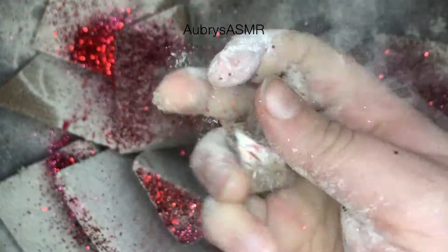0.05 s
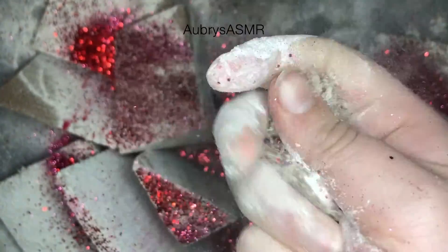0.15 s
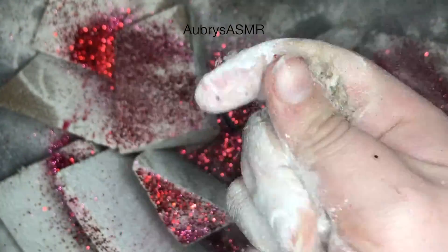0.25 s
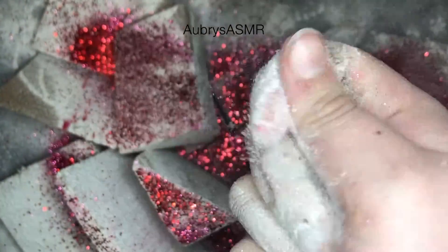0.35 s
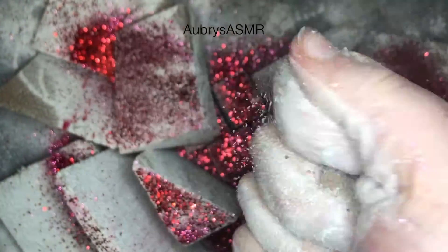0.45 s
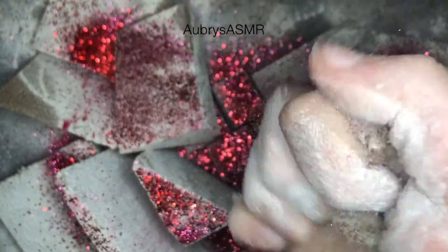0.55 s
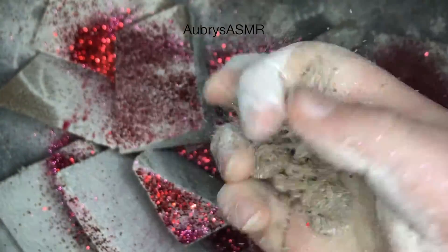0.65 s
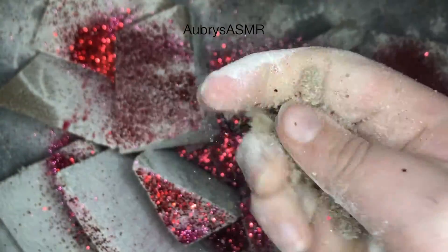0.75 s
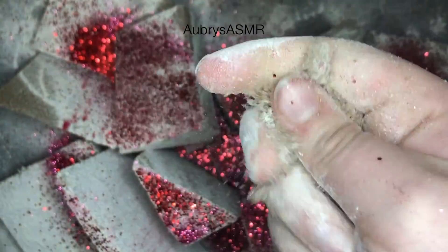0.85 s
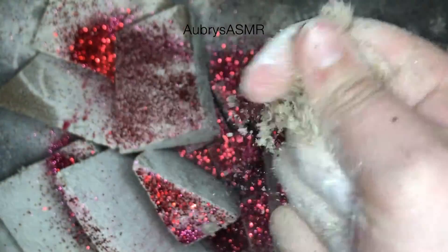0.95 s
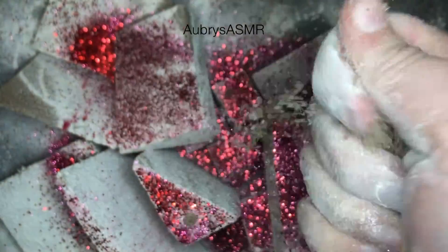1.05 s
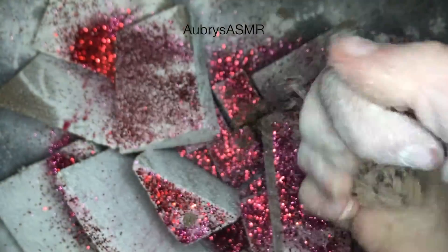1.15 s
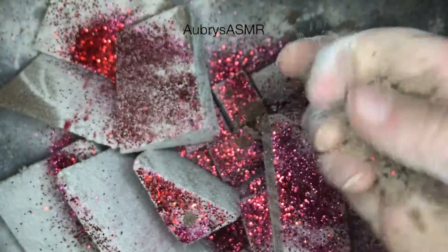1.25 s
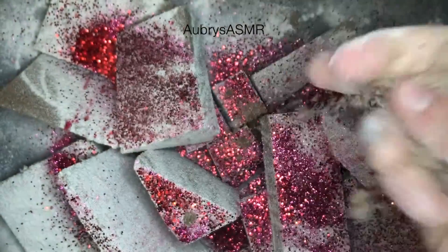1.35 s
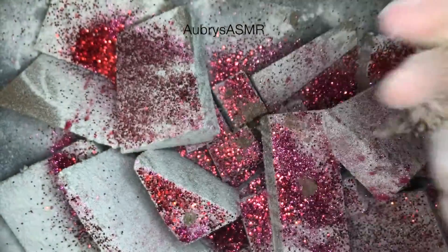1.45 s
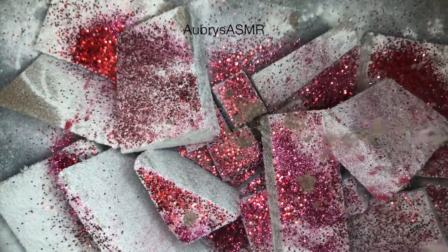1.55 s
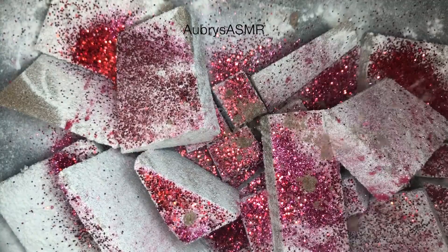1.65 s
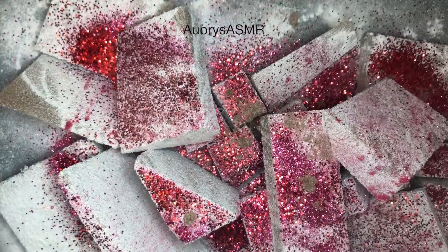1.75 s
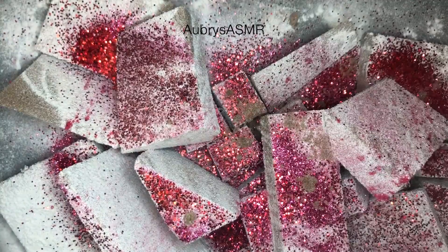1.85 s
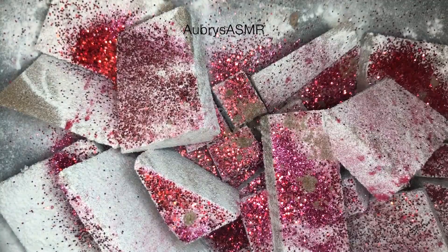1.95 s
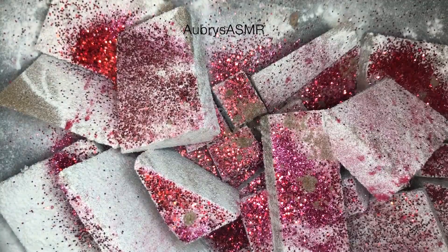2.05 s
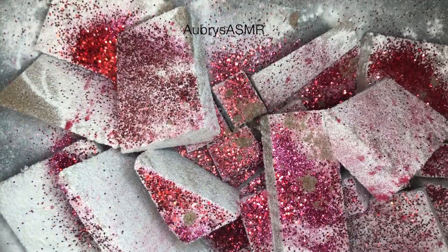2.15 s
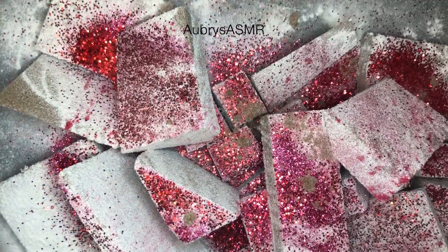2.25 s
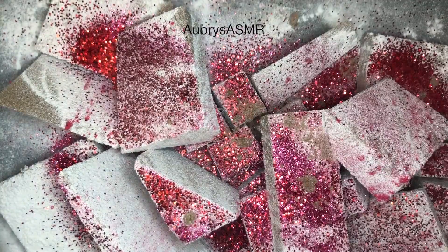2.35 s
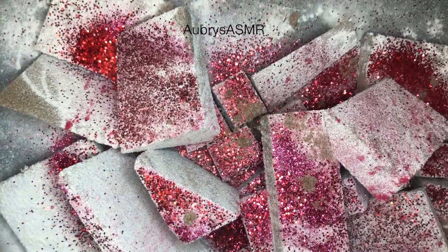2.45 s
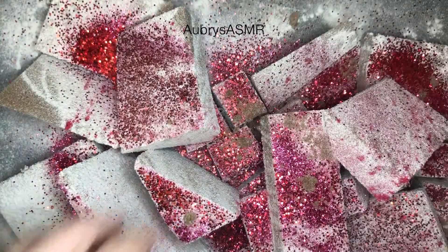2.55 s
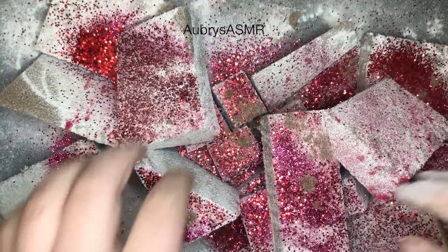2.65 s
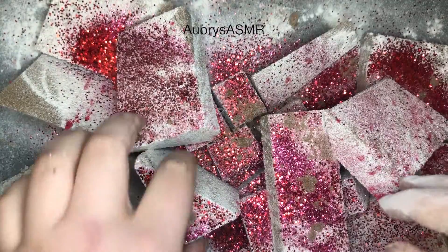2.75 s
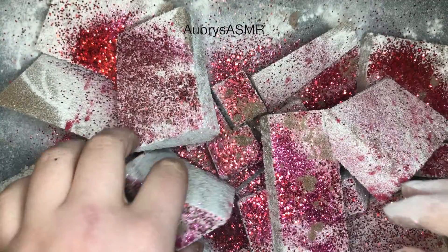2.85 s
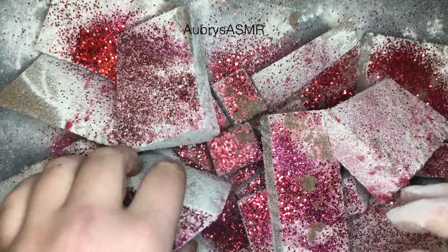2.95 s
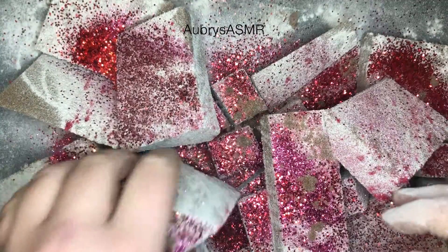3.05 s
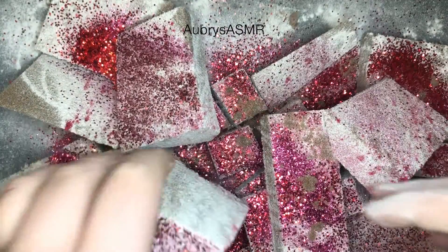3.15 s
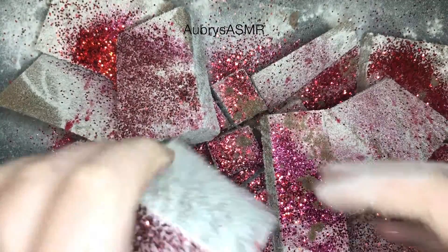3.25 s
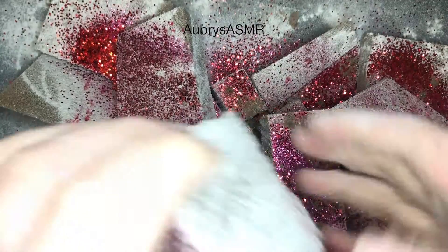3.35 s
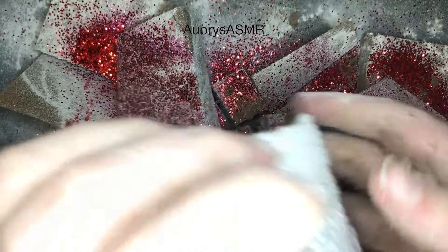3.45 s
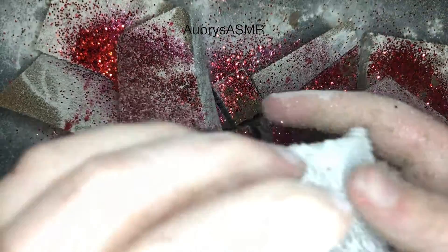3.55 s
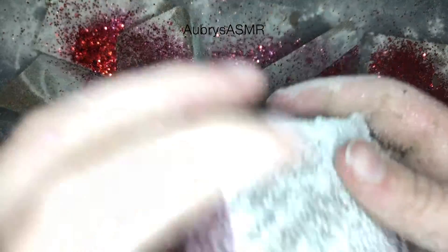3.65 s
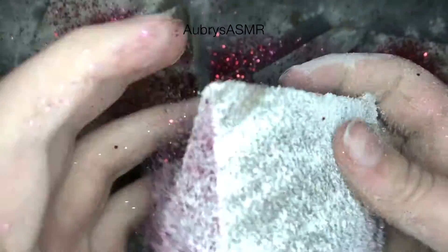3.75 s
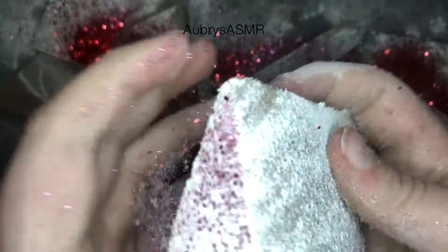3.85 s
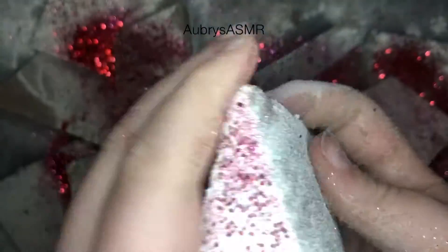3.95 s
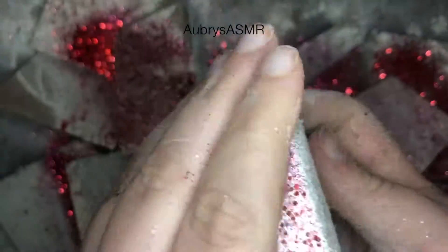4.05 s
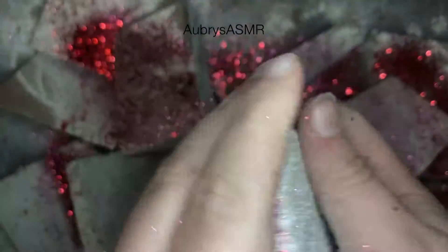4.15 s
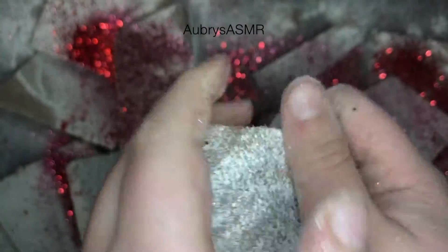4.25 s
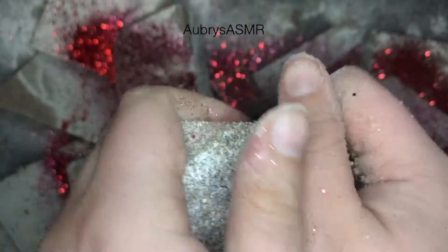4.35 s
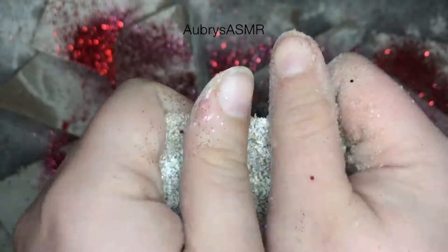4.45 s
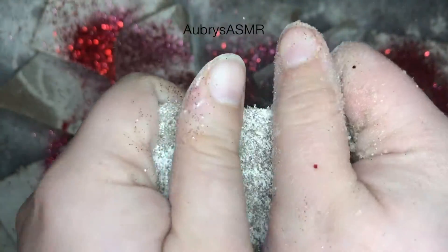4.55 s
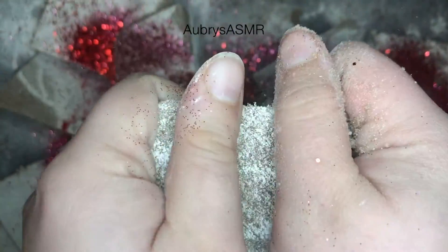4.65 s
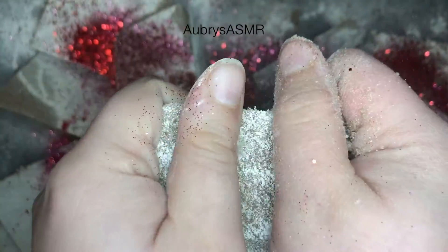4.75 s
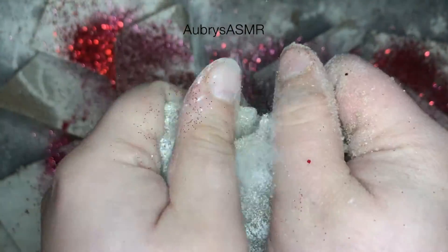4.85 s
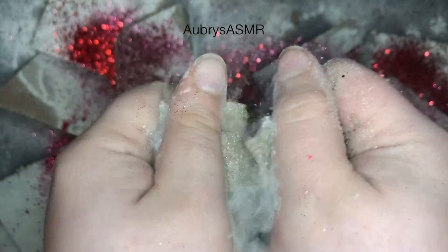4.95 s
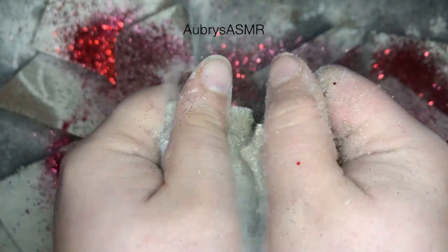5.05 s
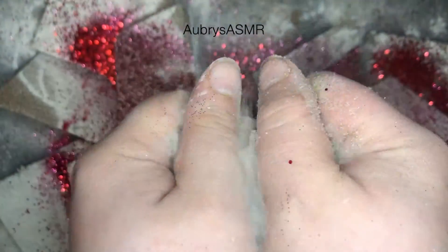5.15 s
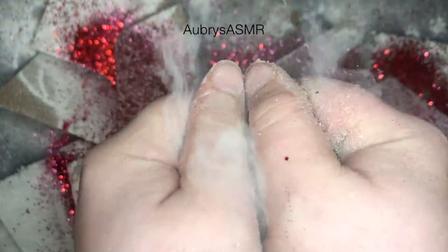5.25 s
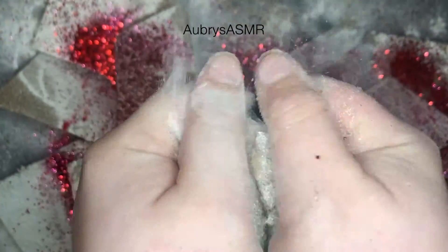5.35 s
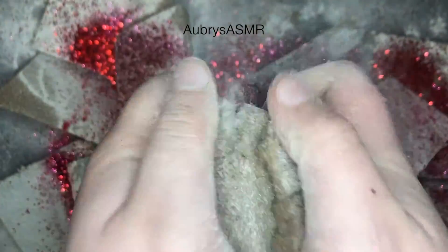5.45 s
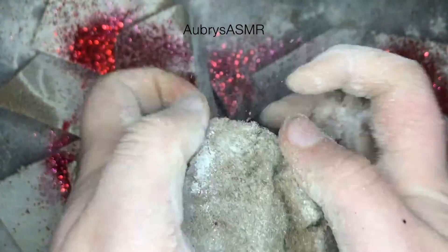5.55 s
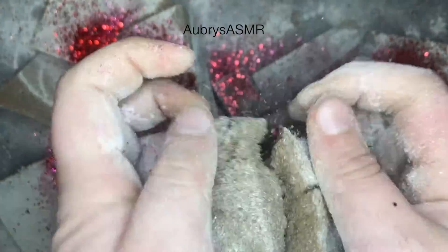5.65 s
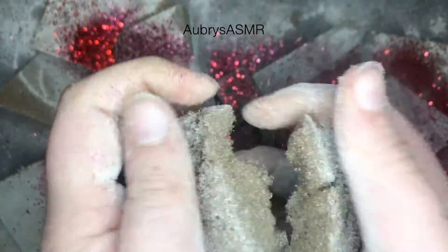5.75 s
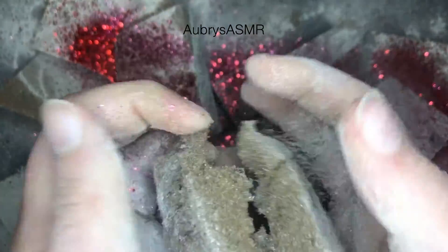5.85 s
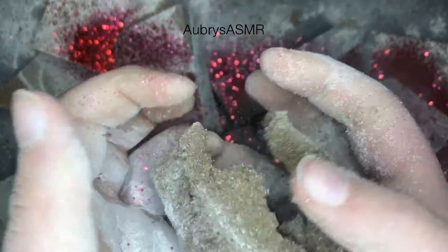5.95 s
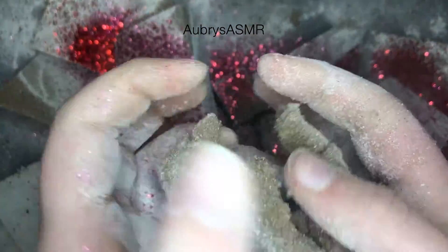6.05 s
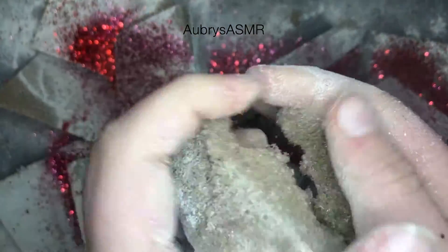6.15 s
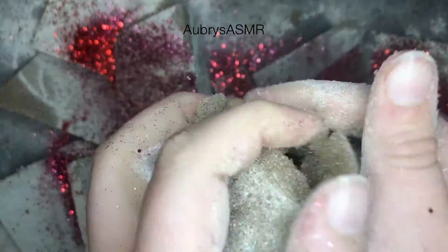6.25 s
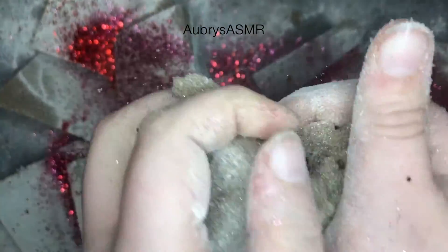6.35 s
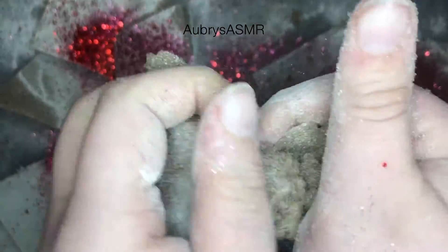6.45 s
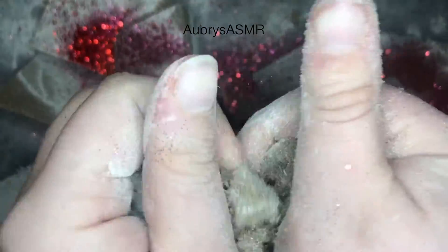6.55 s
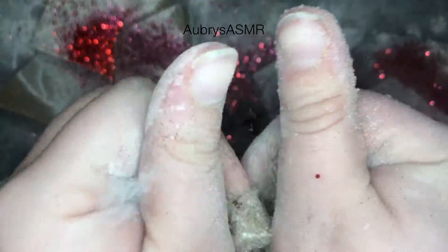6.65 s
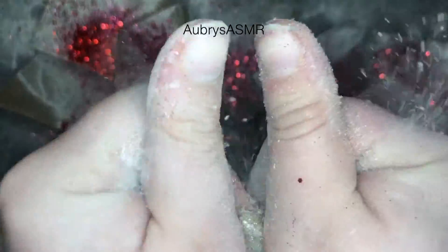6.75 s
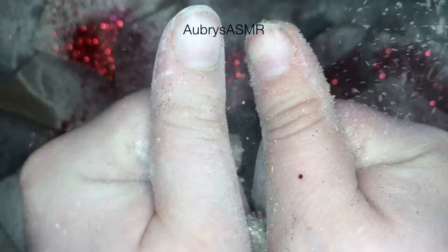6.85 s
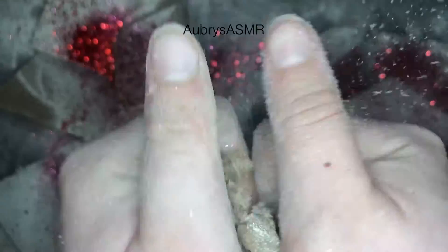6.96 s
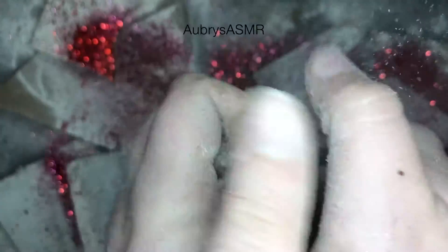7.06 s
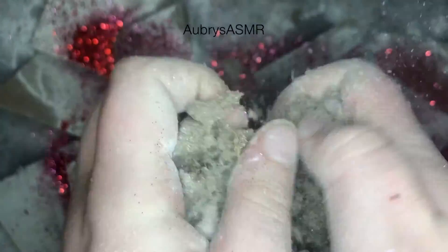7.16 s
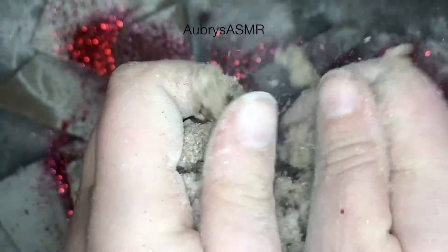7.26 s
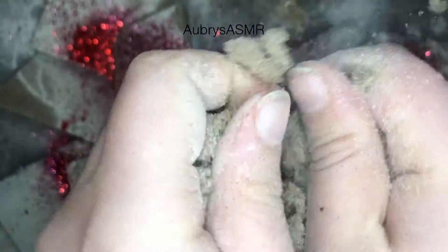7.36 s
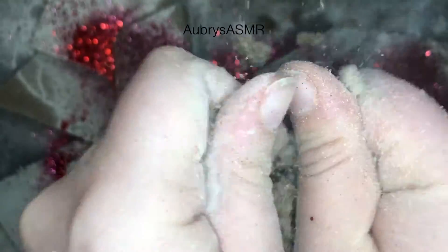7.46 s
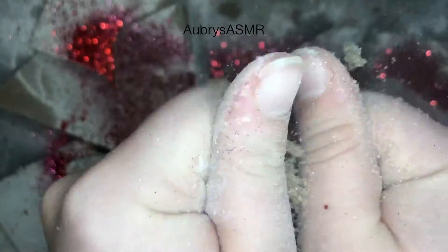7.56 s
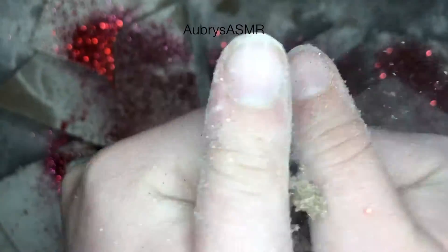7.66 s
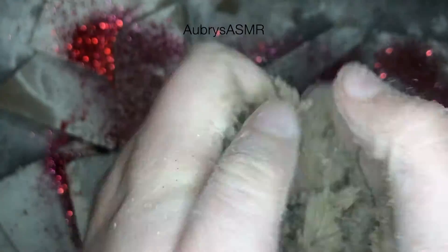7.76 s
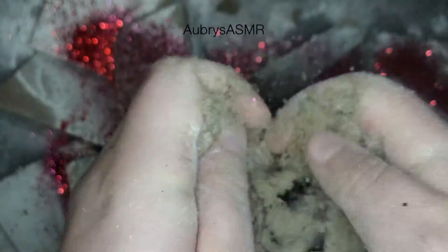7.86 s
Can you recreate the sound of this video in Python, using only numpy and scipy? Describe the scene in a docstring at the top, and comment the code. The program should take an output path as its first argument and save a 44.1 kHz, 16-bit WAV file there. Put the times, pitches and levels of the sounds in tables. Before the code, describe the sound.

Dry brittle foam blocks are crushed in the hands very close up, crackling crisply in two crunchy bouts with a quiet, dusty pause between.

```python
"""Dry foam crumbled by hand

Foam blocks are squeezed and crumbled close to a microphone in a quiet room. Brittle cells snap in clumps:
random clicks and powder noise strike resonances of the cell walls, the block (with a narrow fixed peak,
probably the microphone's) and the cupped hands. Larger cracks are short bursts through walls and block;
dull knocks are puffs through one low resonance.
Short echoes follow, over shaped noise (rumble, hiss) and a faint wavering hum."""
import sys
import numpy as np
from scipy import signal
from scipy.fft import rfft, irfft
from scipy.io import wavfile

SR = 44100
rng = np.random.default_rng(int(sys.argv[2]) if len(sys.argv) > 2 else 0)


def convert_level_to_amplitude(level_db):
    """Map a level in decibels to its linear amplitude factor."""
    exponent = np.asarray(level_db, float) / 20
    return 10 ** exponent


def materialize(psi):
    """Save the field psi as 16-bit PCM at rate SR to the path in sys.argv[1].

    A 1-D psi becomes a single channel; in a 2-D psi each row is a channel.
    """
    bounded = np.clip(np.atleast_2d(psi).T, -1, 1)
    quanta = np.round(bounded * 32767).astype(np.int16)
    wavfile.write(sys.argv[1], SR, quanta)


N = 347949

# cell-wall resonances: f/Hz, width/Hz, relative level/dB
WALL_MODES = [(6740, 1760, -3.5), (8520, 2130, 1.5), (10720, 2000, -0.5), (12840, 5500, -1.5),
              (14840, 1660, 3.5)]
# block resonances, with a narrow fixed peak near 3.2 kHz, probably the microphone's:
# f/Hz, width/Hz, relative level/dB
BLOCK_MODES = [(1673, 430, -12), (2400, 820, -4.5), (3255, 410, 0), (3215, 1200, 1), (3910, 780, -4),
               (4900, 1800, -10)]


def crunch():
    """One train of snaps rings walls and block; coarser crumbs ring the hollow of the hands."""
    # finger presses and touches: full force at t/s, held/s, fizz level/dB, build-up/s, let-go/s
    press_table = [(0.001, 0, -51.5, 1, 0.055), (0.136, 0.0015, -27, 0.044, 0.096),
                   (0.197, 0.14, -30.5, 0.12, 0.061), (0.413, 0.038, -38, 0.25, 0.25),
                   (0.601, 0.031, -48.5, 0.042, 0.014), (0.656, 0, -48, 0.017, 0.06),
                   (0.855, 0.0028, -35.5, 0.07, 0.34), (1.133, 0.071, -46, 0.039, 0.026),
                   (1.437, 0.069, -37.5, 0.12, 0.055), (1.596, 0.017, -46, 0.11, 0.22),
                   (1.845, 0.022, -57.5, 0.42, 0.039), (2.002, 0.085, -63, 0.0086, 0.05),
                   (2.04, 0.021, -47, 0.0095, 0.14), (2.195, 0.044, -58, 0.21, 0.11),
                   (2.378, 0.012, -64, 0.004, 0.059), (2.86, 0.055, -52.5, 0.021, 0.045),
                   (2.978, 0.001, -49, 0.006, 0.28), (3.071, 0.00041, -48, 0.0068, 0.02),
                   (3.178, 0.022, -49.5, 0.0081, 0.0065), (3.408, 0, -58.5, 0.0035, 0.017),
                   (3.442, 0.014, -61, 0.005, 0.032), (3.511, 0, -56.5, 0.033, 0.027),
                   (3.561, 0.011, -38.5, 0.0024, 0.029), (3.651, 0.06, -44.5, 0.088, 0.029),
                   (3.787, 0, -51, 0.0057, 0.086), (3.873, 0, -46.5, 0.01, 0.62),
                   (4.14, 0.28, -38, 0.34, 0.018), (4.333, 0.45, -38, 0.2, 0.085),
                   (4.476, 0.041, -32, 0.18, 0.049), (4.568, 0.054, -36, 0.027, 0.052),
                   (4.861, 0.012, -31.5, 0.71, 0.027), (4.882, 0, -26, 0.0075, 0.019),
                   (4.905, 0.0088, -29.5, 0.01, 0.019), (4.933, 0.0099, -30, 0.022, 0.0077),
                   (4.96, 0.0087, -40, 0.02, 0.05), (4.991, 0.014, -26.5, 0.013, 0.023),
                   (5.034, 0.03, -31.5, 0.012, 0.011), (5.111, 0.19, -29.5, 0.16, 0.11),
                   (5.46, 0.061, -44.5, 0.045, 0.11), (5.666, 0.012, -46.5, 0.19, 0.073),
                   (5.72, 0.029, -58.5, 0.11, 0.98), (6.125, 0.002, -50, 0.021, 0.23),
                   (6.258, 0.19, -38.5, 0.012, 0.169), (6.279, 0.484, -39, 0.17, 0.7),
                   (6.581, 0.005, -31, 0.19, 0.13), (6.701, 0.033, -31.5, 0.067, 0.41),
                   (6.949, 0, -47, 0.15, 0.19), (7.167, 0.0013, -42.5, 0.14, 0.091),
                   (7.296, 0, -39.5, 0.047, 0.11), (7.459, 0.068, -34, 0.17, 0.25),
                   (7.826, 0, -44, 0.08, 0.27)]
    # coarse crumbling in the hands: t/s, level/dB, build-up/s, let-go/s
    crumble_table = [(.376, -51, 0.26, 0.3), (.893, -55, 0.047, 0.041), (1.005, -58.5, 0.14, 0.17),
                     (1.47, -60, 0.13, 0.21), (1.66, -64.5, 0.16, 0.45), (2.91, -63, 0.34, 1),
                     (3.565, -52, 0.011, 0.038), (3.685, -57.5, 0.09, 0.054), (4.359, -45.5, 0.41, 0.28),
                     (4.9, -59, 0.28, 0.36), (5.24, -51, 0.2, 0.15), (5.53, -54, 0.11, 0.11),
                     (5.685, -60.5, 0.22, 0.26), (6.42, -49, 0.35, 0.42), (6.87, -53.5, 0.65, 0.16),
                     (7.19, -54.5, 0.22, 0.059), (7.655, -53, 0.62, 0.067), (7.85, -58.5, 0.24, 0.21)]
    # ring, high when freshly gripped, low once crushed flat: t/s, block against fizz at usual_db/dB
    grip_table = [(.1, -6), (.18, -4), (.24, -12), (.53, -10), (.66, -6.5), (.9, -6), (1.08, -17.5),
                  (1.18, -3), (1.5, -11.5), (1.69, -9), (1.86, -0.5), (2.05, -2.5), (2.33, -6), (2.38, 4),
                  (2.8, 3), (2.9, -5.5), (3.5, 1.5), (3.7, -7.5), (4.14, -2.5), (4.7, -7.5), (5.0, -5),
                  (5.4, -13), (5.47, -2.5), (6.13, -5.5), (6.5, -4), (6.722, -6), (6.82, -9.5), (6.88, -16),
                  (7.04, -5), (7.55, -8.5), (7.75, -2.5), (7.89, -8.5)]
    # cupped-hand resonances: f/Hz, width/Hz, relative level/dB
    hand_modes = [(250, 225, -3.5), (455, 465, -4.5), (723, 280, -5.5), (954, 680, -6), (1513, 335, -0.5)]
    usual_db, brighter_per_db, coarser_per_db = -41, 0.195, 0.07

    fizz_db = swells(*np.transpose(press_table), still_db=-82)  # still: constant faint hiss under the presses
    crumble_s, crumble_peak_db, rise_s, fall_s = np.transpose(crumble_table)
    crumble_db = swells(crumble_s, 0, crumble_peak_db, rise_s, fall_s, still_db=-81.5)

    # harder presses fizz more than they ring, and break larger cells; light touches stir powder
    harder_db = fizz_db - usual_db
    block_db = np.interp(np.arange(N) / SR, *np.transpose(grip_table)) - brighter_per_db * harder_db
    coarse_db = coarser_per_db * harder_db

    clicks = snaps(coarse_db, spread_db=3.5, clump_db=1.52)
    coarser = snaps(coarse_db, spread_db=2.0, clump_db=4.0)
    crumbs = rms_one(clicks) + 1.15 * rms_one(coarser)

    walls = rms_one(ring(clicks, WALL_MODES, scatter_db=1.5, wander_db=1.65))
    block = rms_one(ring(clicks, BLOCK_MODES, scatter_db=3.0, wander_db=3.0)) * convert_level_to_amplitude(block_db)
    hands = rms_one(ring(crumbs, hand_modes, scatter_db=4.5, wander_db=2.0))
    return convert_level_to_amplitude(fizz_db) * (walls + block) + convert_level_to_amplitude(crumble_db) * hands


def swells(s, held_s, level_db, rise_s, fall_s, still_db):
    """Level in dB: each effort builds up, holds, lets go; powers add over a still level."""
    ramp_db = 20  # a build-up or let-go spans this in its time
    now = np.arange(0, N + 32, 32)[:, None] / SR
    early = np.maximum(s - now, 0) / rise_s
    late = np.maximum(now - s - held_s, 0) / fall_s
    efforts = convert_level_to_amplitude(level_db - ramp_db * (early + late)) ** 2
    power = convert_level_to_amplitude(still_db) ** 2 + np.sum(efforts, axis=1)
    return np.interp(np.arange(N) / SR, now[:, 0], 10 * np.log10(power))


def snaps(coarse_db, spread_db, clump_db, dust_db=3.5):
    """Cells break at random, many small, few large, in clumps as a fracture runs; powder hisses between."""
    snaps_per_s = 900
    born = rng.random(N) < snaps_per_s / SR
    sizes_db = spread_db * np.minimum(rng.exponential(1, N), 4.0)
    breaks = rms_one(born * convert_level_to_amplitude(sizes_db))
    powder = rng.standard_normal(N)

    grain, dust = convert_level_to_amplitude(coarse_db), convert_level_to_amplitude(dust_db)
    mix = (grain * breaks + dust * powder) / np.hypot(grain, dust)
    clumps_db = clump_db * (0.38 * drift(30.0) + drift(129.0))
    return mix * convert_level_to_amplitude(clumps_db)


def ring(clicks, modes, scatter_db, wander_db):
    """Every click strikes each resonance at its own strength; colour wanders as the grip shifts."""
    out = 0
    for hz, width_hz, level_db in modes:
        chance_db = scatter_db * rng.standard_normal(N) + wander_db * drift(6.7)
        strength = convert_level_to_amplitude(level_db + chance_db) * rng.choice([-1, 1], N)
        struck = clicks * strength + 1e-18
        out = out + resonate(resonate(struck, hz, width_hz), hz, 3.4 * width_hz)
    return out


def resonate(x, hz, width_hz):
    """Two-pole resonance, gain about 1 on top."""
    r = np.exp(-np.pi * width_hz / SR)
    feedback = [1, -2 * r * np.cos(2 * np.pi * hz / SR), r * r]
    return signal.lfilter([(1 - r * r) / 2, 0, (r * r - 1) / 2], feedback, x)


def drift(rate_hz):
    """Slow chance: noise twice through a one-pole low-pass, rms about 1."""
    r = np.exp(-2 * np.pi * rate_hz / SR)
    slow = signal.lfilter([1], [1, -2 * r, r * r], rng.standard_normal(N + 4000))
    return rms_one(slow[4000:])  # filter start dropped


def rms_one(x):
    """Scale to rms 1."""
    return x / np.sqrt(np.mean(x ** 2) + 1e-20)


def cracks(size=1000, decay_s=0.00047):
    """A crack is a dry, fast-decaying burst of snaps through walls and block."""
    # larger cracks: t/s, peak level/dB, treble against block ring/dB
    crack_table = [(0.1362, -13, -3), (0.1387, -11, 2), (0.1468, -17, -2), (0.1696, -17, -1),
                   (0.1812, -19, -3), (0.2209, -15, 13), (0.2392, -15, 3), (0.2623, -11, 8),
                   (0.2949, -17, 10), (0.3121, -19, -4), (0.3257, -16, 17), (0.3512, -10, 22),
                   (0.3745, -28, -10), (0.4012, -28, -2), (0.4224, -24, -6), (0.4415, -30, -6),
                   (0.5708, -17, 11), (1.8548, -28, -3), (2.04, -27, 1), (2.195, -42, -2),
                   (2.5411, -51, -5), (2.6135, -50, -5), (3.036, -37, 2), (3.0813, -33, 4), (3.217, -40, 0),
                   (3.4526, -39, -3), (3.502, -41, 0), (3.5637, -18, -5), (3.5731, -18, -4),
                   (3.7901, -31, 6), (3.8737, -25, 4), (3.921, -29, 5), (3.9856, -29, -6),
                   (4.1334, -26, -2), (4.3377, -21, 2), (4.3915, -20, -2), (4.491, -13, 13),
                   (4.5308, -22, -2), (4.5712, -21, -5), (4.6369, -19, 9), (4.753, -20, 2), (4.8825, -8, 8),
                   (4.8852, -10, -2), (4.8918, -17, -2), (4.9038, -17, 4), (4.9118, -15, 0),
                   (4.9342, -15, 2), (4.9376, -13, -3), (4.9543, -15, 7), (4.9926, -9, -3),
                   (5.1668, -15, 4), (5.3023, -18, 17), (5.3828, -27, 0), (5.9284, -40, 14),
                   (6.0825, -38, -5), (6.1476, -32, -8), (6.2672, -14, 7), (6.3397, -18, 9),
                   (6.3733, -17, 14), (6.3856, -17, -1), (6.5064, -11, 6), (6.5242, -13, -6),
                   (6.5875, -16, 3), (6.6556, -17, 4), (6.6737, -12, 9), (6.7992, -19, 4)]
    bursts = np.tile(np.exp(-np.arange(size) / (decay_s * SR)), len(crack_table))
    strike = np.pad(bursts, (0, N - bursts.size))
    all_walls = ring(strike, WALL_MODES, scatter_db=2.5, wander_db=0)
    all_block = ring(strike, BLOCK_MODES, scatter_db=2.5, wander_db=0)

    out = np.zeros(N + size)
    for k, (s, peak_db, treble_db) in enumerate(crack_table):
        own = slice(size * k, size * (k + 1))
        burst = convert_level_to_amplitude(treble_db) * rms_one(all_walls[own]) + rms_one(all_block[own])
        at = round(s * SR)
        out[at:at + size] += convert_level_to_amplitude(peak_db) * burst / np.abs(burst).max()
    return out[:N]


def knocks(cycles=1.0, size=3000):
    """Pieces shift in the hands: a short puff through a low, quickly damped resonance."""
    # dull knocks: t/s, peak level/dB, f/Hz
    knock_table = [(0.3132, -28.5, 1210), (0.3743, -30.5, 1020), (4.345, -35, 600), (4.371, -37, 550),
                   (4.4653, -34, 795), (4.491, -35.5, 800), (5.5316, -44.5, 250.0), (5.6875, -50, 250.0),
                   (6.374, -35.5, 850), (6.4399, -41.5, 442), (6.615, -28.5, 1530), (6.722, -30.5, 1600.0),
                   (6.862, -37.5, 795), (6.89, -37, 770), (7.2096, -52, 202), (7.6473, -47, 755)]
    out, t = np.zeros(N + size), np.arange(size) / SR
    noise = rng.standard_normal((len(knock_table), size))
    for (s, peak_db, hz), puff in zip(knock_table, noise):
        puff = puff * np.exp(-t * hz / 2.5)
        knock = resonate(resonate(puff, hz, hz / cycles), hz, 2.0 * hz)
        at = round(s * SR)
        out[at:at + size] += convert_level_to_amplitude(peak_db) * knock / np.abs(knock).max()
    return out[:N]


def aside(x, fade_s=0.021):
    """Empty hands are dusted off aside: with no block held, the low body drops away."""
    from_s, to_s, lowest_hz = 1.88, 2.3, 2650
    now = np.arange(N) / SR
    share = np.clip(np.minimum(now - from_s, to_s - now) / fade_s, 0, 1)
    thin = signal.sosfilt(signal.butter(10, lowest_hz, "high", fs=SR, output="sos"), x)
    return (1 - share) * x + share * thin


def tray(x, level_db=-13, t60_s=0.055):
    """Short diffuse echoes off the tray and the other blocks: decaying noise as impulse response."""
    t = np.arange(3000) / SR
    echo = rng.standard_normal(3000) * convert_level_to_amplitude(-60 * t / t60_s) * (t > .001)
    echo = echo / np.sqrt(np.sum(echo ** 2))
    return convert_level_to_amplitude(level_db) * signal.fftconvolve(x, echo)[:N]


def room():
    """Unsteady air rumble and hiss as shaped noise, with a wavering hum."""
    # air noise spectrum: f/Hz, relative density/dB
    air_table = [(20, -14.5), (45, -5), (130, 0), (500, -14.5), (1200, -16), (1640, -15), (2150, -22.5),
                 (7000, -27), (15500, -30)]
    # dips of the whole room sound: t/s, gain/dB
    dip_table = [(4.85, 0), (5.05, -6.5), (5.33, -4), (5.38, -13), (5.44, -16), (5.48, -3), (6.3, -3)]
    air_db, hum_hz, hum_db = -64, 118.3, -74.5

    hz, density_db = np.transpose(air_table)
    bins_hz = np.maximum(np.fft.rfftfreq(N, 1 / SR), 1)
    shape = convert_level_to_amplitude(np.interp(np.log(bins_hz), np.log(hz), density_db))
    air = rms_one(irfft(rfft(rng.standard_normal(N)) * shape, N))
    air = convert_level_to_amplitude(air_db + 1.56 * drift(3.8)) * air

    now = np.arange(N) / SR
    hum = np.sqrt(2) * np.sin(2 * np.pi * hum_hz * now + 0.37 * drift(4.9))
    hum = convert_level_to_amplitude(hum_db + 2.0 * drift(3.1)) * hum
    return convert_level_to_amplitude(np.interp(now, *np.transpose(dip_table))) * (air + hum)


def scene():
    """Foam with its nearby echoes over the room."""
    foam = aside(crunch() + cracks() + knocks())
    return (foam + tray(foam) + room())[None]


def top_cut(x):
    """Nothing passes above the cut-off."""
    return signal.sosfilt(signal.butter(12, 17000, fs=SR, output="sos"), x)


def record(dry):
    """Steep low-pass, 70 dB down from 16 kHz up."""
    low_pass = signal.cheby2(30, 70, 16000, fs=SR, output="sos")
    cut = signal.sosfilt(low_pass, dry)
    return top_cut(cut)


dry = scene()
out = record(dry)
materialize(out)
```